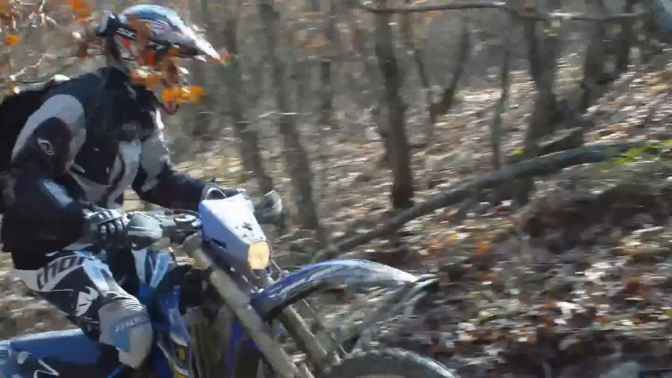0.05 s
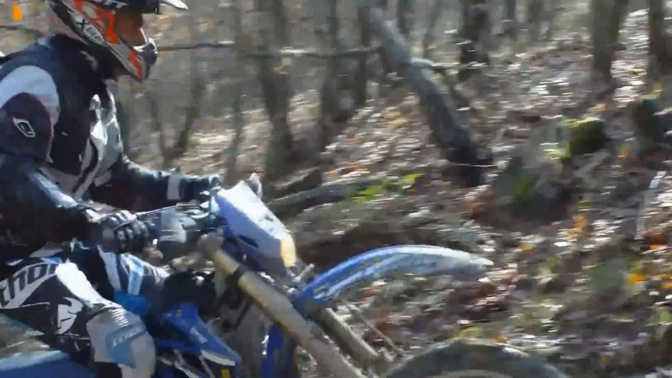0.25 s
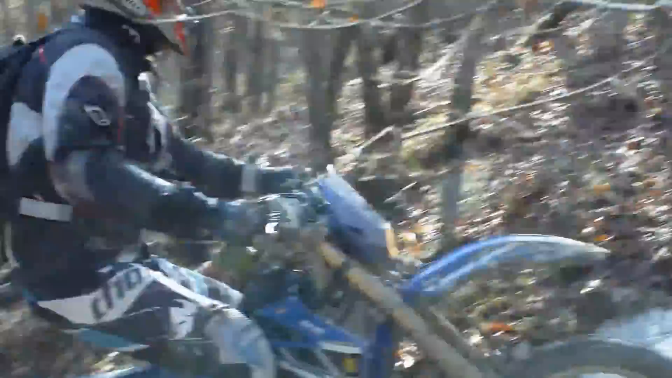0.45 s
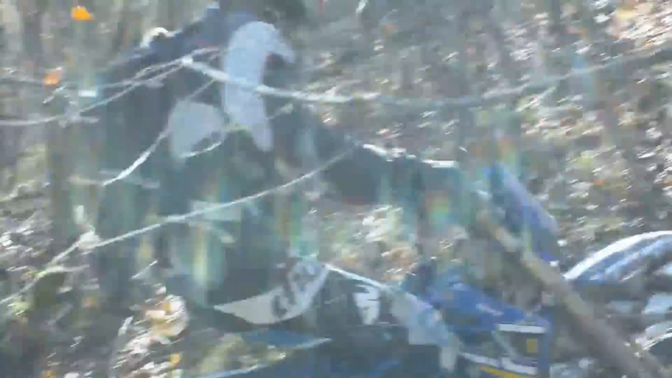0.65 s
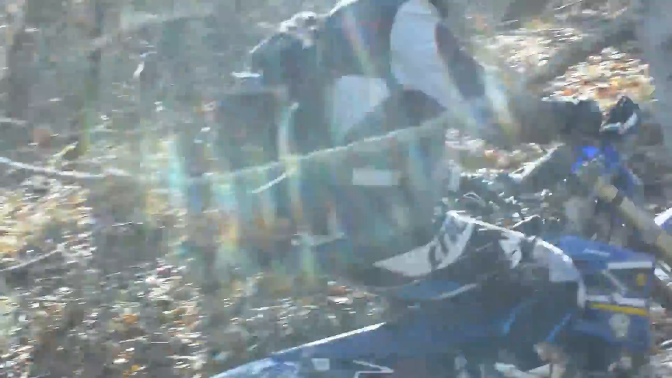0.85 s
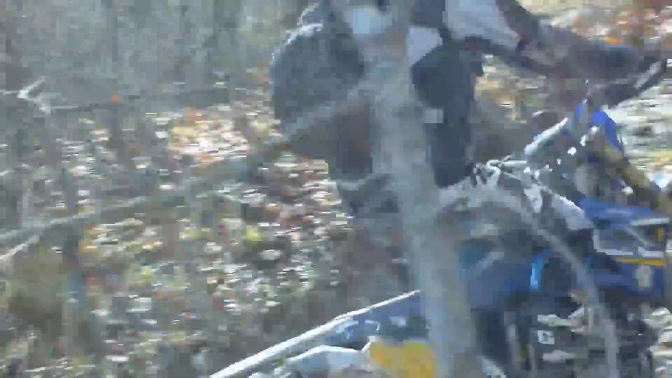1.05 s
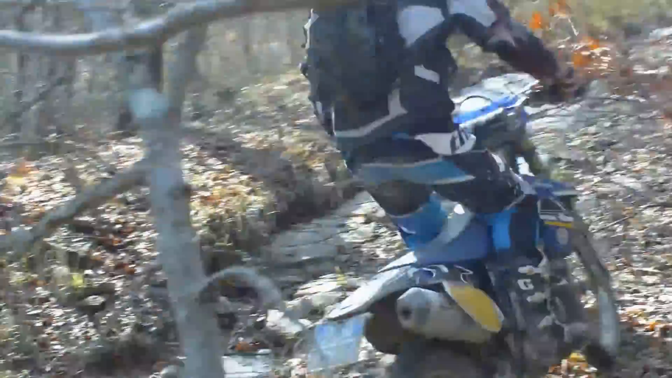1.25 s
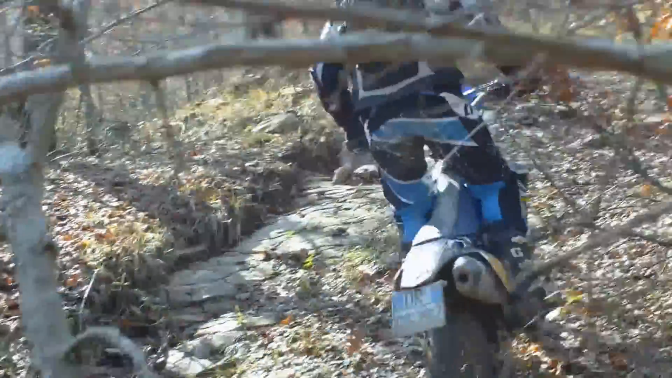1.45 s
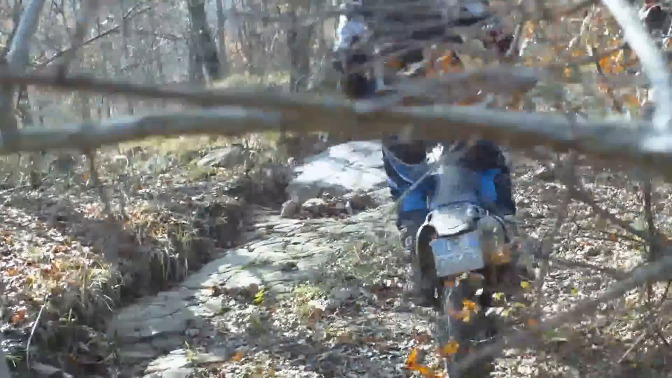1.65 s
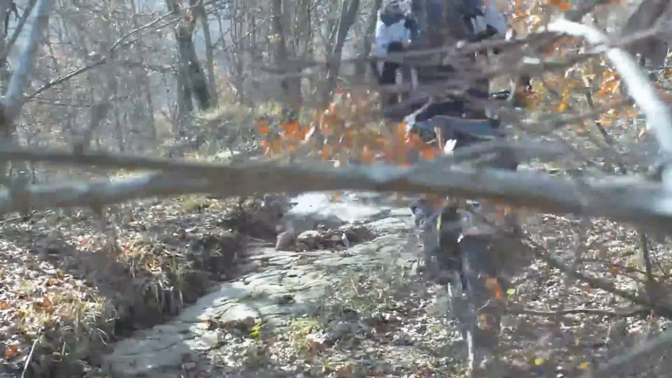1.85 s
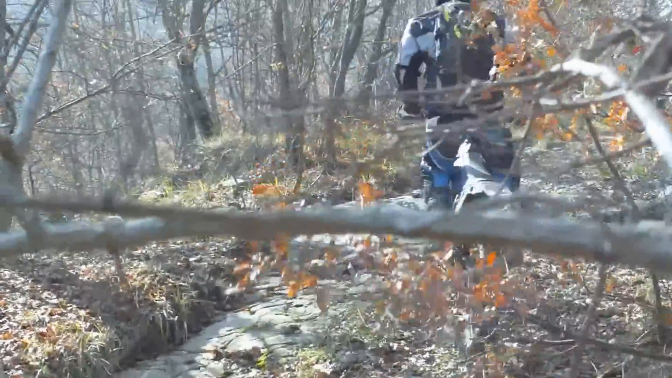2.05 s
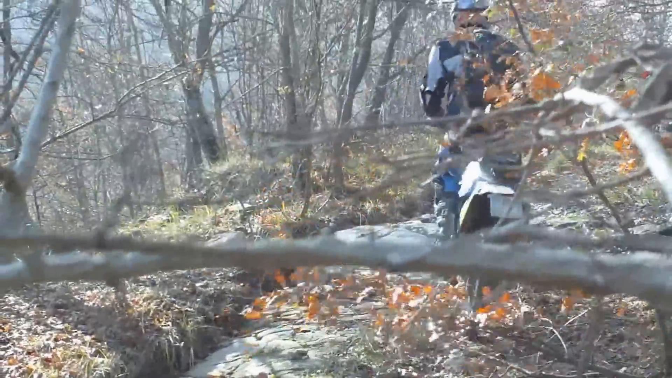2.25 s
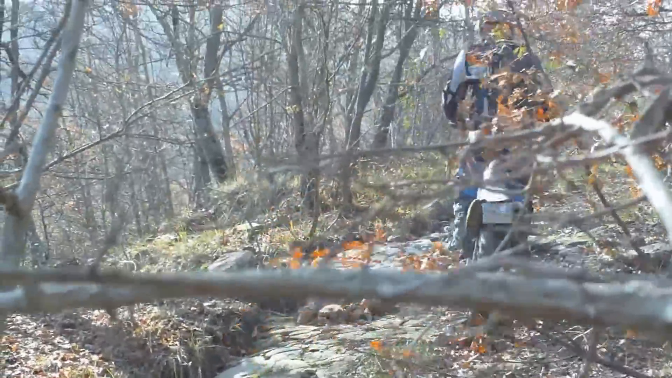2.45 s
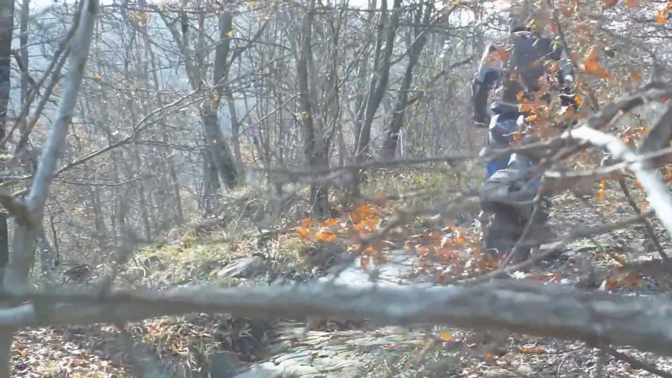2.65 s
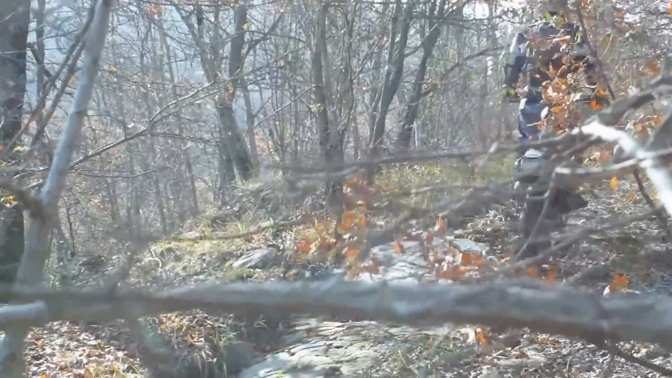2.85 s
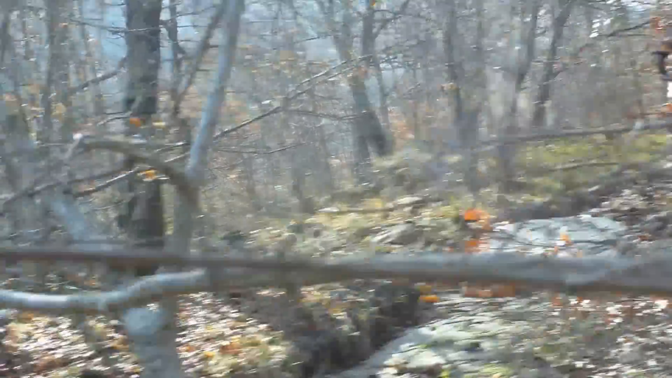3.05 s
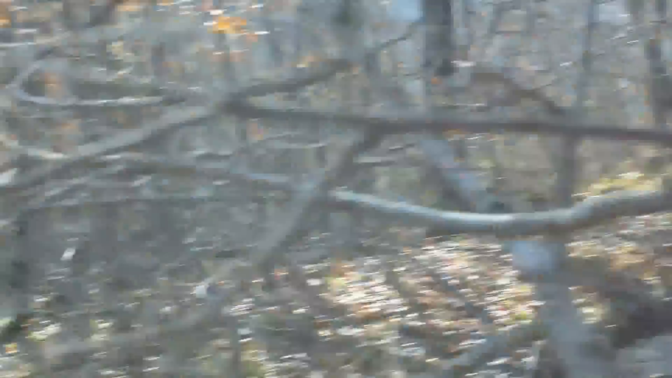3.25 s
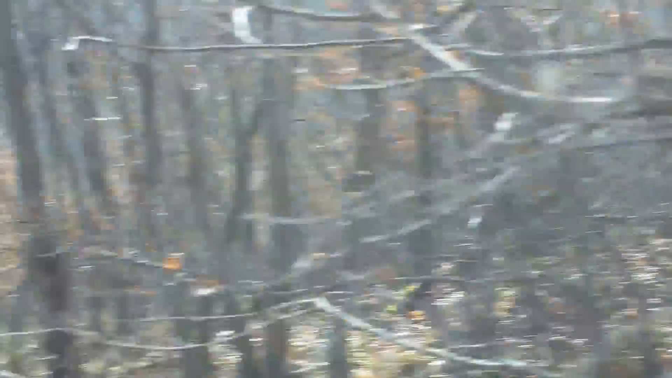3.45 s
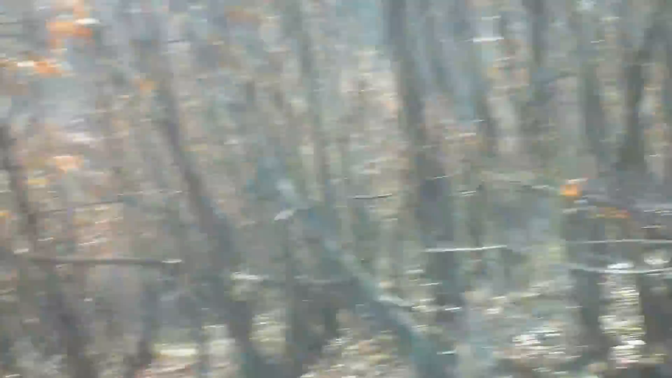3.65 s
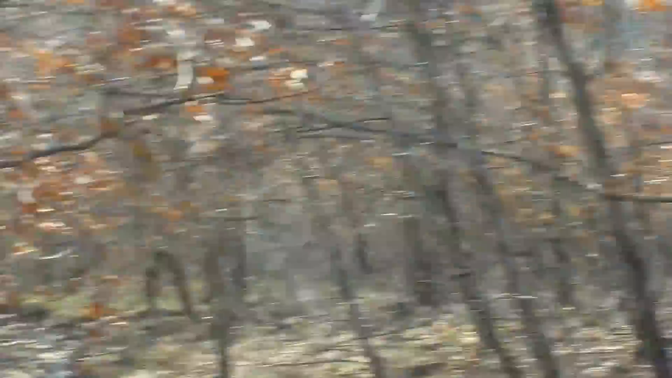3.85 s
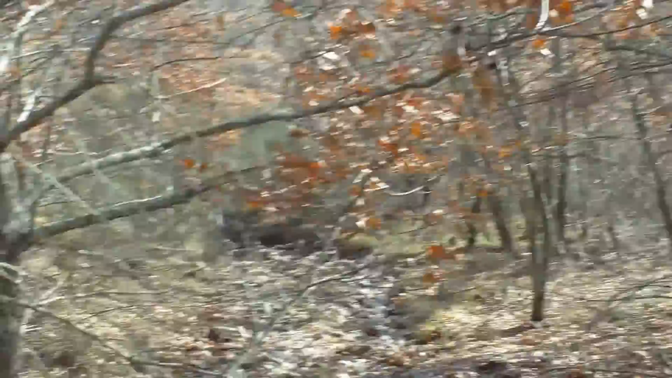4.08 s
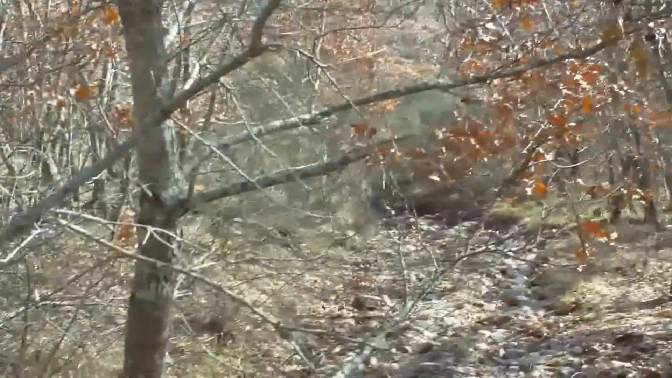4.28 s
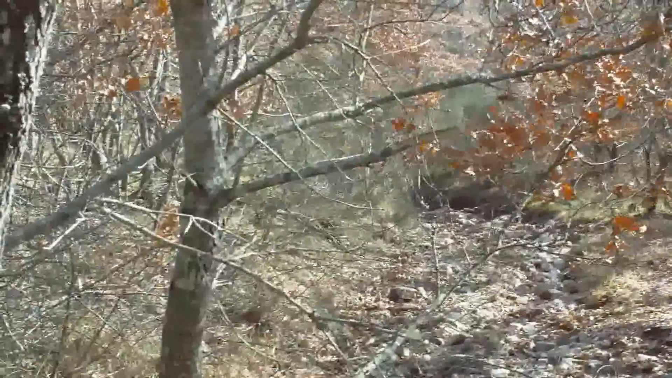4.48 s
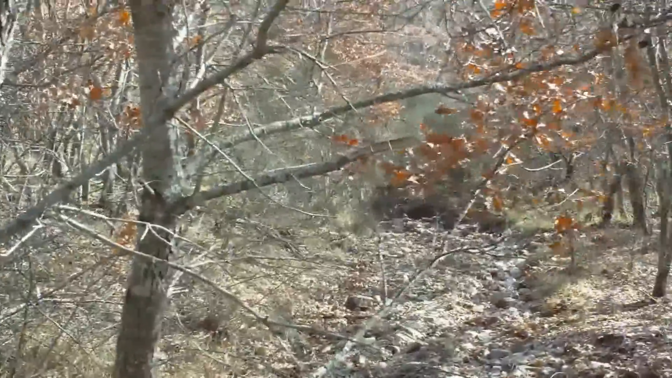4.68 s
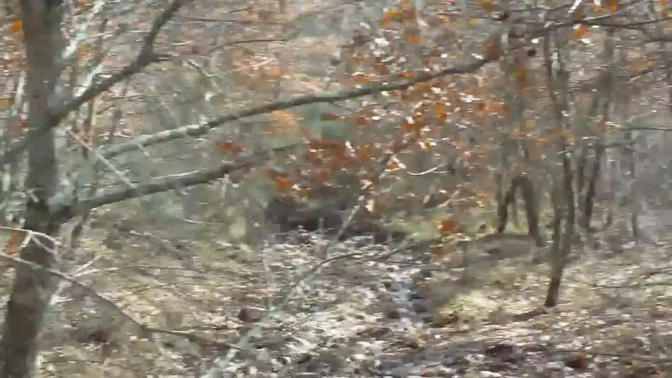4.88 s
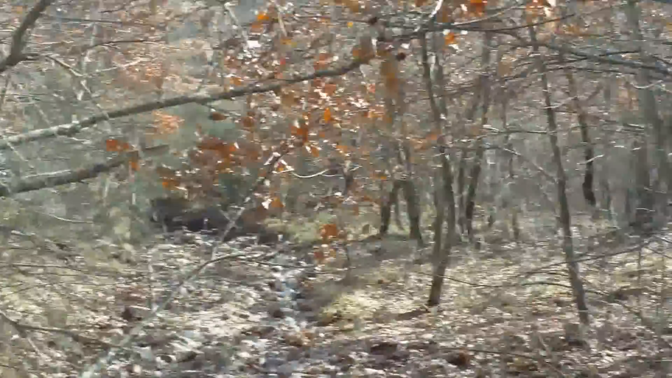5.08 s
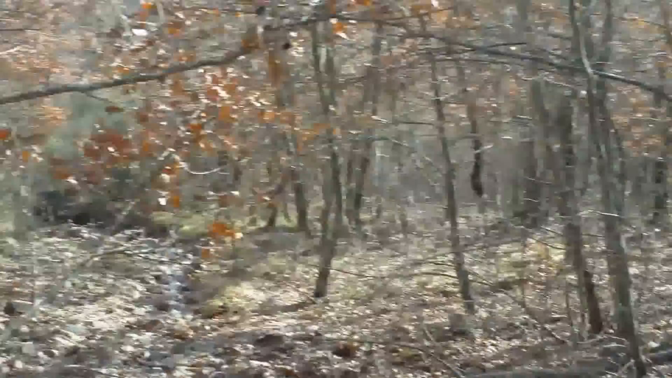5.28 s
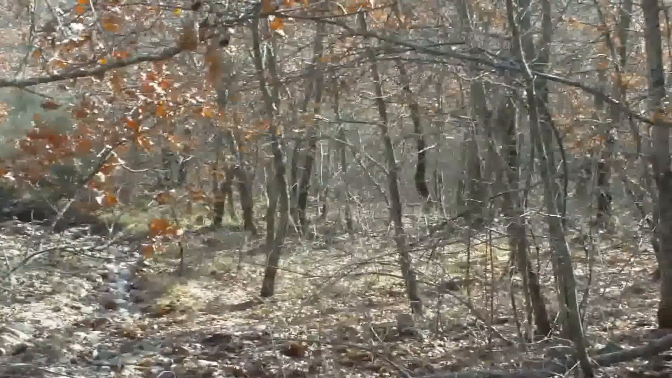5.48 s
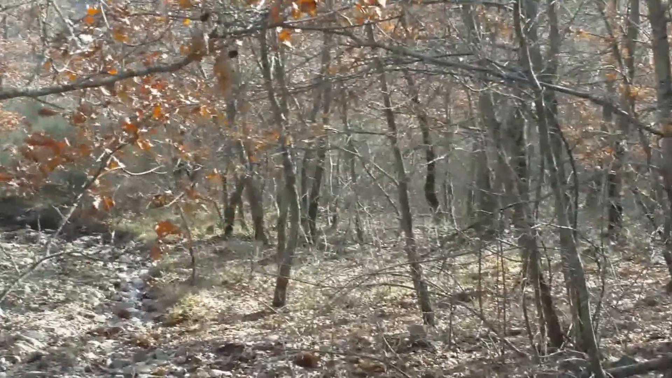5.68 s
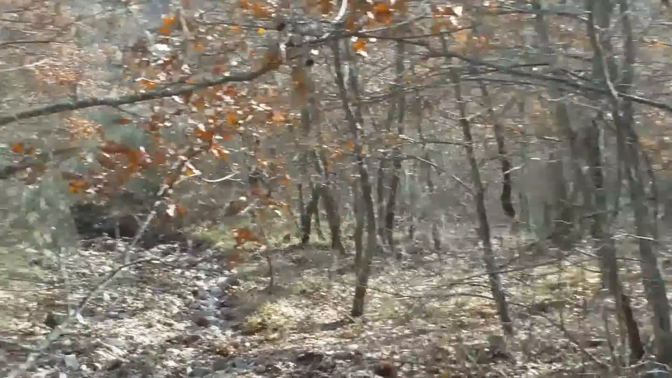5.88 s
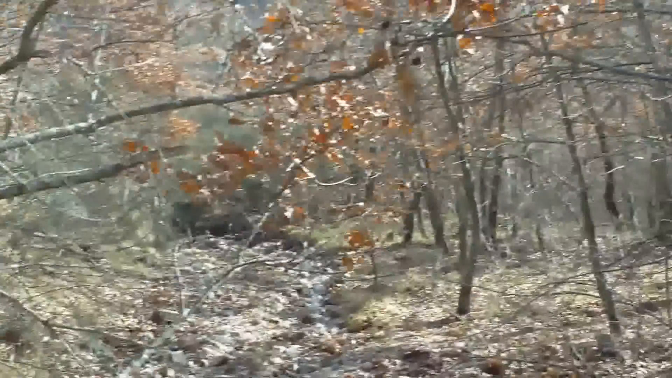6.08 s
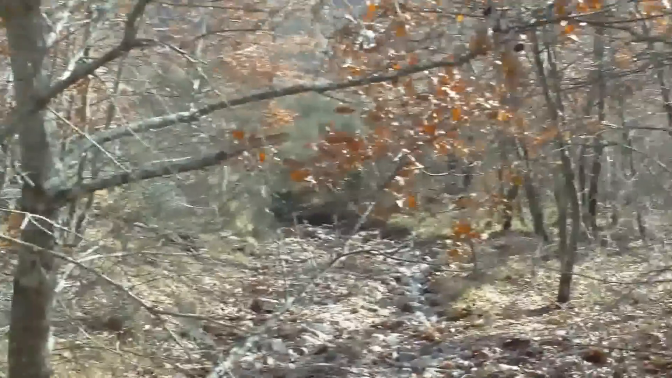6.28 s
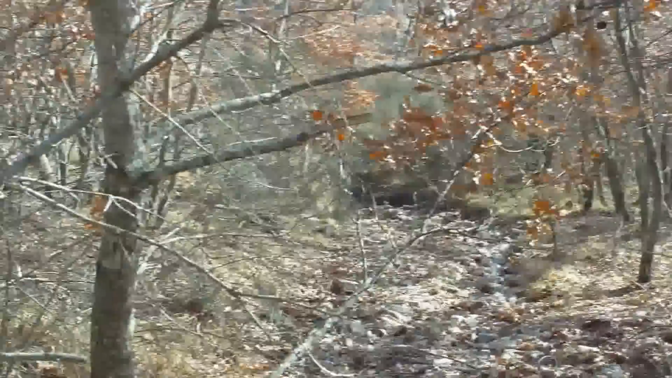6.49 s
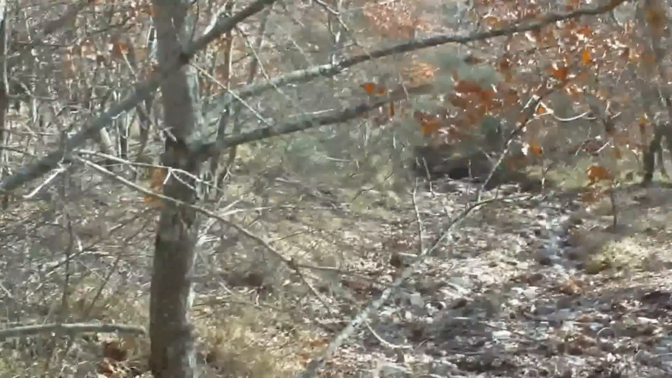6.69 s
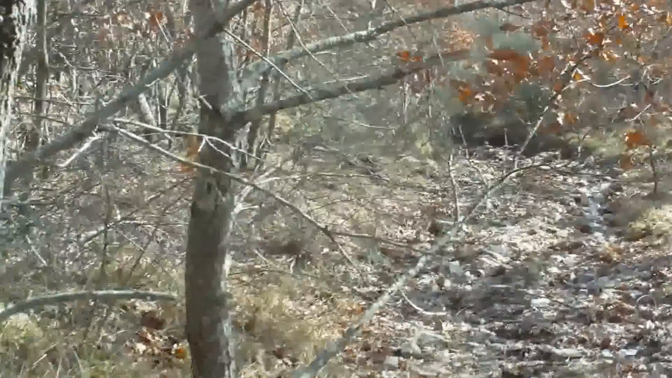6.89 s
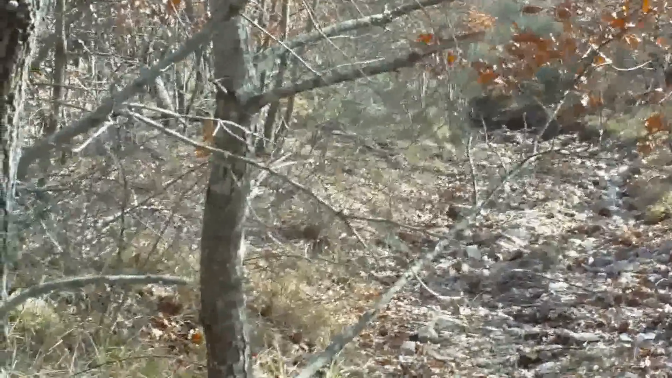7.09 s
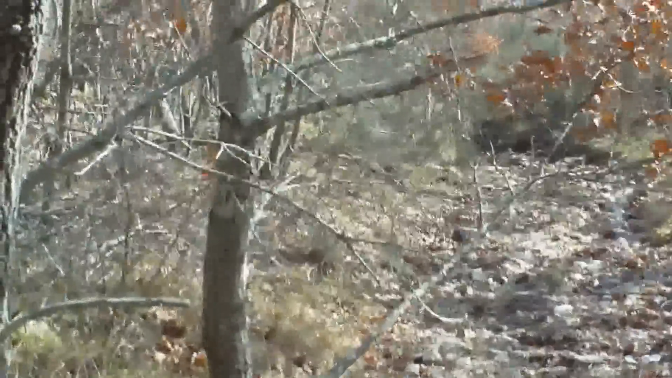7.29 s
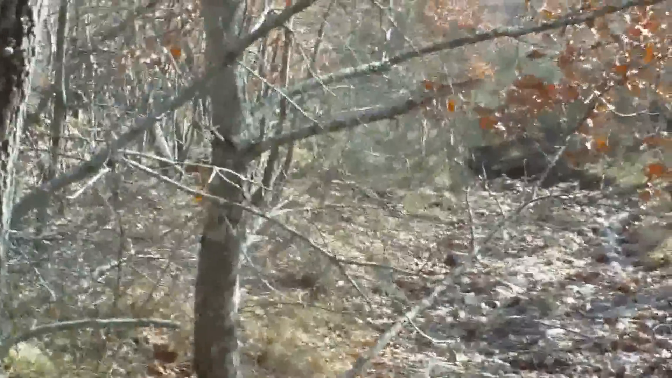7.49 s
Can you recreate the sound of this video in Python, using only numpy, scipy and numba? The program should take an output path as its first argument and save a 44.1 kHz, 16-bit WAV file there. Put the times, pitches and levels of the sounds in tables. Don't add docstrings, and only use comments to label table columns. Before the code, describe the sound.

A dirt bike blares past very close with cracking exhaust, pops and rattles away to a soft idle, then leaves rustle and a branch snaps.

```python
import sys
import numpy as np
from scipy import signal
from scipy.fft import rfft, irfft, next_fast_len
from scipy.io import wavfile
from scipy.ndimage import uniform_filter1d
from numba import njit

SR = 44100
rng = np.random.default_rng(int(sys.argv[2]) if len(sys.argv) > 2 else 0)


def elevation(decibels):
    levels = np.asarray(decibels, float)
    return 10 ** (levels / 20)


def unload_wav(signal):
    wavfile.write(
        sys.argv[1],
        SR,
        np.round(np.clip(np.atleast_2d(signal).T, -1, 1) * 32767).astype(np.int16),
    )


N = 332073

# (time [s], peak level [dB], ring frequency [Hz], edge above ring [dB])
HARD_FIRINGS = [(.030, -27, 790, -19), (.120, -30, 920, -17), (0.206, -16, 830, -15),
                (.235, -2.5, 784, -25), (0.264, -1, 695, -24), (.343, -3.5, 1140, -12),
                (.394, -1.5, 1175, -16), (.446, -7.5, 1140, -15), (.524, -17, 910, -19),
                (.771, -16, 800, -28), (.806, -8, 765, -30), (.836, -9, 800, -30), (1.012, -24, 700, -30),
                (1.053, -1, 768, -8), (1.239, -2, 817, -41), (1.271, -1, 1230, -8), (1.301, -3.5, 820, -35),
                (1.333, -5.5, 1250, -33), (1.362, -13, 830, -31), (1.479, -4, 720, -31),
                (1.528, -6, 910, -37), (1.554, -0.5, 1305, -8.5), (1.58, -6, 894, -5),
                (1.602, -2.5, 910, -23), (1.894, -9.5, 934, -31.5), (2.502, -10.5, 798, -28),
                (2.63, -21, 710, -34), (2.659, -7.5, 815, -22), (3.061, -2.5, 877, -35),
                (3.311, -11.5, 970, -24), (3.345, -12.5, 830, -24), (3.451, -11.5, 1135, -15),
                (3.669, -19.5, 1050, -32), (3.774, -10.5, 1280, -8), (3.805, -19, 983, -21),
                (3.986, -19.5, 1365, -8), (4.606, -15.5, 1120, -30), (4.635, -22, 1130, -27),
                (5.803, -43, 900, -15), (5.917, -52, 400, -20), (6.096, -52, 704, -6),
                (6.371, -52, 400, -20), (6.501, -50, 400, -20), (6.697, -39, 500, -15),
                (6.829, -52, 400, -20)]
# (time [s], peak level [dB], ring frequency [Hz], edge above ring [dB])
SHARP_CRACKS = [(1.8381, -3, 874, -8), (2.4687, -9, 1470, -13), (3.7076, -17, 1050, -10),
                (3.7428, -11, 1280, 0.5), (4.4902, -4, 1130, -8), (4.5189, -3.5, 1145, -3.5),
                (5.193, -21, 810, 0), (5.233, -15.5, 870, -9), (5.268, -27, 870, -5), (5.302, -25, 900, -7),
                (5.336, -25, 850, -6), (5.372, -26, 920, -8), (5.406, -24, 816, 1), (5.44, -26, 930, -8)]
# (time [s], firing rate [1/s])
ENGINE_SPEED = [(0, 31.5), (.13, 32.9), (.31, 38), (.47, 38.6), (.5, 39), (.56, 43), (.62, 45), (.67, 29.5),
                (.75, 29.5), (.85, 32), (.9, 30), (.98, 27.5), (1.03, 29.6), (1.1, 32.2), (1.35, 32.3),
                (1.48, 38.5), (1.6, 42), (1.64, 40.8), (1.71, 37), (1.8, 37.1), (1.9, 35.1), (2.02, 35.6),
                (2.1, 36.9), (2.23, 31), (2.36, 24.9), (2.47, 28), (2.55, 31.8), (2.65, 33), (2.74, 32.3),
                (2.85, 33.9), (3.03, 30.2), (3.07, 30.5), (3.15, 34), (3.24, 31.3), (3.38, 28.5), (3.5, 26),
                (3.68, 24), (3.76, 31.5), (3.81, 30.5), (3.88, 27), (3.97, 28.5), (4.05, 26), (4.3, 24.5),
                (4.46, 24.5), (4.51, 34), (4.6, 35), (4.72, 28.5), (4.9, 20), (5.05, 17.5), (5.17, 25),
                (5.25, 28.5), (5.33, 29.4), (5.42, 28.5), (5.55, 24.5), (5.62, 21.5), (5.9, 18.4),
                (6.08, 15.3), (6.3, 14.7), (7, 15), (7.35, 14.64), (7.55, 17.74)]


def rms_one(x):
    return x / np.sqrt(np.mean(x ** 2) + 1e-20)


def in_time(rows):
    s, *columns = np.transpose(rows)
    return [np.interp(np.arange(N) / SR, s, c) for c in columns]


def ramp(start_s, length_s):
    return np.clip((np.arange(N) / SR - start_s) / length_s, 0, 1)


def resonance(x, hz, width_hz):
    r = np.exp(-np.pi * width_hz / SR)
    feedback = [1, -2 * r * np.cos(2 * np.pi * hz / SR), r * r]
    return signal.lfilter([(1 - r * r) / 2, 0, (r * r - 1) / 2], feedback, x + 1e-18)


def body(x, modes):
    return sum((-1) ** k * elevation(db) * resonance(x, hz, width) for k, (hz, width, db) in enumerate(modes))


@njit
def gliding(x, hz, width_hz, sr):
    r = np.exp(-np.pi * width_hz / sr)
    y = np.zeros(len(x))
    for i in range(2, len(x)):
        drive = (1 - r * r) / 2 * (x[i] - x[i - 2])
        y[i] = drive + 2 * r * np.cos(2 * np.pi * hz[i] / sr) * y[i - 1] - r * r * y[i - 2]
    return y


def band(x, low_hz, high_hz):
    return signal.sosfilt(signal.butter(2, [low_hz, high_hz], "band", fs=SR, output="sos"), x)


def evened(x):
    return x / np.sqrt(uniform_filter1d(x ** 2, size=7000) + 1e-12)


def per_firing(x, level_db, at, spread_db):
    starts = np.r_[0, at[1:]]
    length = np.diff(np.r_[starts, N])
    rms = np.sqrt(np.add.reduceat(x ** 2, starts) / length + 1e-20)
    gain = elevation(level_db[starts + length // 3] + spread_db * rng.standard_normal(len(at))) / rms
    return x * uniform_filter1d(np.repeat(gain, length), size=60)


def firings():
    start_turn, peak_lag_s = 0.82, 0.0084
    crack_lag_s = 0.00032
    speed, = in_time(ENGINE_SPEED)
    t = np.arange(N) / SR
    turns = start_turn + np.cumsum(uniform_filter1d(speed, size=1500)) / SR
    hard_s = np.transpose(sorted(HARD_FIRINGS + SHARP_CRACKS))[0] - crack_lag_s + peak_lag_s
    hard = np.interp(hard_s, t, turns)
    whole = np.round(hard[0]) + np.r_[0, np.cumsum(np.round(np.diff(hard)))]
    turns += uniform_filter1d(np.interp(t, hard_s, whole - hard), size=5000)
    firing_s = np.interp(np.arange(1, int(turns[-1]) + 1), turns, t) - peak_lag_s
    return np.maximum((firing_s * SR).astype(int), 0)


def throttle():
    # (opens [s], shuts [s], bark on opening [dB], bark on shutting [dB],
    # hollow boom above bark [dB])
    pulls = [(-.1, 0.021, -33, -15, -21.5), (0.114, 0.255, -18.5, -14.5, -18.5),
             (0.268, 0.486, -13.5, -16, -13.5), (0.506, 0.65, -13.5, -14.5, -10.5),
             (.665, 0.743, -16, -17.5, -14), (0.77, 0.85, -17.5, -14.5, -9), (.86, 0.99, -17, -19.5, -23.5),
             (1.0, 1.03, -18, -18, -13), (1.026, 1.222, -16, -14.5, -10.5),
             (1.242, 1.475, -17.5, -18, -4.5), (1.488, 1.58, -13, -26, -1),
             (1.567, 1.631, -24.5, -20.5, -9), (1.677, 1.831, -16, -17, -7.5),
             (1.855, 2.097, -18, -17.5, -9), (2.205, 2.464, -30.5, -27, -21.5),
             (2.456, 2.72, -23.5, -17.5, -18), (2.726, 3.047, -19, -25, -15), (3.043, 3.35, -21, -26, -12),
             (3.56, 3.66, -44, -38, -15), (3.672, 3.766, -33, -25, -1), (3.896, 4.01, -38, -30, -4),
             (4.014, 4.218, -33, -37.5, -5.5), (4.256, 4.482, -41.5, -41.5, -15),
             (4.477, 4.516, -22.5, -25, 0), (4.653, 4.854, -34, -41.5, -20), (5.09, 5.142, -57, -44, -15),
             (5.135, 5.163, -44, -44, -15), (5.167, 5.442, -31.5, -33.5, -6.5),
             (5.703, 7.6, -50.5, -64.5, -10.5)]
    rise_db_per_s, shut_s, shut_db, coast_db_per_s = 350, 0.13, 10, 29
    t = np.arange(0, N + 64, 64) / SR
    opens, shuts, first_db, last_db, hollow_db = np.transpose(pulls)[:, :, None]
    coast = 1 - np.exp(-np.maximum(t - shuts, 0) / shut_s) * (t >= opens)
    progress = np.clip((t - opens) / (shuts - opens), 0, 1)
    level_db = first_db + (last_db - first_db) * progress - shut_db * coast
    level_db -= rise_db_per_s * np.maximum(opens - t, 0) + coast_db_per_s * np.maximum(t - shuts, 0)
    top = level_db.argmax(axis=0)
    rows = [t, level_db.max(axis=0), hollow_db[top, 0], coast[top, np.arange(len(t))]]
    return in_time(np.transpose(rows))


def blowdown(at, rise_s, fall_s, open_share, echo_s, echo):
    cycle = np.clip(np.searchsorted(at, np.arange(N), "right") - 1, 0, len(at) - 2)
    age_s = np.maximum(np.arange(N) - at[cycle], 0) / SR
    turn = age_s * SR / np.diff(at)[cycle]

    def puff(t):
        t = np.maximum(t, 0)
        return (1 - np.exp(-t / rise_s)) * np.exp(-t / fall_s)

    valve = 1 / (1 + np.exp((turn - open_share) / 0.2))
    return rms_one((puff(age_s) + echo * puff(age_s - echo_s)) * valve)


def train(at, spread_db):
    clicks = np.zeros(N)
    clicks[at] = elevation(spread_db * rng.standard_normal(len(at)))
    return clicks


def boom(at, bark_db, deep_db, hollow_db, coast):
    # (time [s], deep frequency [Hz], hollow frequency [Hz],
    # clean pipe tone above bark [dB])
    chambers = [(0, 147, 310, -28), (.15, 176, 307, -16), (.27, 199, 367, -7), (.45, 200, 370, -11.5),
                (.56, 210, 385, -21), (.64, 180, 405, -24), (.7, 135, 325, -21.5), (.8, 138, 325, -21),
                (1.03, 134, 302, -23), (1.15, 172, 367, -29.5), (1.45, 166, 357.5, -12.5),
                (1.6, 190, 356, -4.5), (1.8, 165, 376, -9.5), (2.1, 176, 377, -5.5), (2.38, 129, 337, -13),
                (2.55, 164, 340, -15.5), (2.8, 175, 338, -22), (3.3, 162, 333, -31.5),
                (3.45, 143, 331, -14), (3.8, 156, 329, -29), (4.5, 149, 356, -10.5), (5.3, 147, 321, -9),
                (5.8, 138, 321, -15), (7.53, 134, 325, -10)]
    # (time [s], level above deep boom [dB])
    crank = [(0, -25), (.3, -19), (.6, -11), (.75, -20), (1.3, -19), (1.6, -14), (2.1, -26.5), (2.4, -28.5),
             (3.4, -25.5), (7.53, -28)]
    pipe_tone_hz, deep_width_hz, hollow_width_hz = 553, 100, 89
    hollow_coast_hz, hollow_coast_db, deep_coast_db = 27, -14, -3
    deep_hz, hollow_hz, tone_db = in_time(chambers)
    deep_db = bark_db + deep_db + deep_coast_db * coast
    hollow_db = bark_db + hollow_db + hollow_coast_db * np.minimum(2 * coast, 1)
    hollow_hz = hollow_hz + hollow_coast_hz * coast
    pulses = rms_one(train(at, spread_db=0.5)) + .12 * rng.standard_normal(N)

    deep = gliding(gliding(pulses, deep_hz, deep_width_hz, SR), deep_hz, deep_width_hz, SR)
    deep = band(band(deep, 118, 260), 112, 400)
    deep = np.roll(deep, -int(0.0072 * SR))

    roughness = np.interp(np.arange(N) / SR, [2.1, 2.5], [.1, .45])
    rough = pulses + roughness * rng.standard_normal(N)
    hollow = gliding(gliding(rough, hollow_hz, hollow_width_hz, SR), hollow_hz, hollow_width_hz, SR)
    hollow *= blowdown(at, 0.002, 0.02, open_share=0.75, echo_s=0.014, echo=0.07) + 0.3
    hollow = band(hollow, 235, 790)

    second_order = band(gliding(pulses, 2 * in_time(ENGINE_SPEED)[0], 16, SR), 50, 100)
    tone = resonance(resonance(pulses, pipe_tone_hz, 130), pipe_tone_hz, 130)
    out = per_firing(deep, deep_db, at, spread_db=2.0)
    out += elevation(deep_db + in_time(crank)[0]) * evened(second_order)
    out += per_firing(tone, bark_db + tone_db, at, spread_db=-3.0)
    return out + per_firing(hollow, hollow_db, at, spread_db=1.0)


def pipe_bark(at, bark_db, steady, noise, lumps, centre_hz):
    # (frequency [Hz], width [Hz], level [dB])
    tailpipe = [(586.4, 102, 2), (688, 190, 6), (805, 293, 2)]
    # (frequency [Hz], width [Hz], level [dB])
    header = [(1160, 250, 0), (1370, 133, 7), (1442, 272, 4)]
    # (time [s], frequency [Hz], level above noise drive [dB])
    flank = [(0, 1300, -7), (.45, 1350, -17.5), (.65, 1410, 2.5), (.9, 1330, -1), (1.0, 1320, 0),
             (1.15, 1340, -8), (1.6, 1377, -18.5), (7.53, 1360, -31.5)]
    flow = blowdown(at, 0.0007, 0.0032, open_share=0.3, echo_s=0.0075, echo=0.55)
    gas = noise * ((1 - steady) * flow + .85 * steady) * lumps
    drive = gas[0] + 10.5 * train(at, spread_db=1.5)
    side = elevation((centre_hz - 950) / 22)
    bark = body(drive, tailpipe) + side * body(drive, header)
    bark += .7 * gliding(gas[2], centre_hz, 250, SR)
    whine_hz, whine_db = in_time(flank)
    bark += elevation(whine_db + 1) * gliding(gas[1], whine_hz, 200, SR)
    cap = 1.3 * ramp(3.2, 1) * resonance(resonance(drive, 417, 150), 417, 150)
    return per_firing(band(band(bark, 480, 1700), 450, 1800) + cap, bark_db, at, spread_db=1.0)


def plate_rasp(at, bark_db, spit, noise, lumps):
    # (frequency [Hz], width [Hz], level [dB])
    plates = [(1970, 190, 7.5), (2430, 420, 4), (3117, 360, -1), (3800, 670, -6.5)]
    rasp_db = bark_db - 9 + (0.78 - 1) * (bark_db + 21.5) + 2.5 * ramp(3.2, 1)
    gas = noise * spit * lumps
    loose = 4.2 * ramp(3.8, 2.4) * resonance(gas[0], 2790, 200)
    return per_firing(body(gas[1], plates) + loose, rasp_db, at, spread_db=1.2)


def valve_hiss(at, bark_db, hiss_db, spit, noise):
    # (frequency [Hz], width [Hz], level [dB])
    gear = [(3480, 820, 4.5), (4170, 160, 1), (4474, 130, 0), (5570, 66, 2.5)]
    hiss_db = bark_db + hiss_db + (0.8 - 1) * (bark_db + 1.5)
    gas = noise * (spit + .8)
    return per_firing(body(gas[2], gear) + 1.7 * band(gas[1], 3020, 6360), hiss_db, at, spread_db=1.5)


def after_ring(at, bark_db):
    # (time [s], ring frequency [Hz], level above bark [dB])
    ringing = [(0, 700, -17.5), (.9, 700, -12), (1.2, 728, -10), (1.6, 666, -8), (1.7, 628, -2.5),
               (2.1, 662, -1.5), (2.3, 647, -3), (2.5, 700, -6.5), (2.9, 700, 1.5), (3.35, 724, -6),
               (3.7, 786, -10), (4.4, 790, -24), (5.3, 820, 1), (5.7, 800, -20), (7.53, 805, -23)]
    start_s, length_s = 0.0066, 0.01
    hz, ring_db = in_time(ringing)
    cycle = np.clip(np.searchsorted(at, np.arange(N), "right") - 1, 0, len(at) - 1)
    chance = rng.standard_normal((len(at), 3))[cycle].T
    age_s = (np.arange(N) - at[cycle]) / SR - start_s - .001 * chance[0]
    shape = np.sin(np.pi * np.clip(age_s / length_s, 0, 1) ** 1.3)
    swing = np.sin(2 * np.pi * hz[at[cycle]] * (1 + .04 * chance[1]) * age_s)
    return 2 * elevation(bark_db + ring_db + 2.0 * chance[2]) * shape * swing


def engine():
    # (time [s], bark centre [Hz], steady clatter share [0-1],
    # deep boom above bark [dB], hiss above bark [dB])
    view = [(0, 906, 0.44, -20.5, -9.5), (.5, 894, 1, -20, -11.5), (.62, 906, 0.85, -29, -10),
            (.95, 920, 0.94, -26.5, -12), (1.32, 844, 0.2, -20.5, -11.5), (1.6, 890, 0.3, -17, -13.5),
            (1.95, 750, 0.35, -16.5, -16), (2.3, 975, 0.5, -12.5, -14), (2.55, 810, 0.49, -17, -17),
            (2.9, 750, 0.41, -16, -15), (3.25, 946, 0.53, -17, -14), (3.8, 950, 0.47, -10.5, -14.5),
            (4.36, 890, 0.76, -12, -17), (4.56, 1000, 0.35, -15.5, -15), (5.2, 920, 0.52, -15, -15),
            (5.75, 960, 0.35, -11, -20.5), (6.3, 1000, 0.26, -3.5, -36), (7.53, 920, 0.3, 6.5, -1)]
    spit_lag_s, coast_clatter = 0.0015, 0.56
    at = firings()
    bark_db, hollow_db, coast = throttle()
    centre_hz, steady, deep_db, hiss_db = in_time(view)
    steady = np.clip(steady + coast_clatter * coast, 0, 1)
    noise = rng.standard_normal((3, N))
    lumps = elevation(2.0 * rms_one(band(rng.standard_normal(N), 52, 270)))
    late = at + int(spit_lag_s * SR)
    flow = blowdown(late, 0.0024, 0.0046, open_share=0.32, echo_s=0.0034, echo=0.1)
    spit = (1 - steady) * flow + 2.4 * steady
    out = pipe_bark(at, bark_db, steady, noise, lumps, centre_hz)
    out += plate_rasp(at, bark_db, spit, noise, lumps)
    out += valve_hiss(at, bark_db, hiss_db, spit, noise)
    out += boom(at, bark_db, deep_db, hollow_db, coast)
    return out + after_ring(at, bark_db)


def floor():
    # (frequency [Hz], level [dB per Hz])
    hush = [(18, -57), (30, -32), (138, -1.5), (381, -9.5), (694, -8.5), (1520, -16), (2780, -20),
            (5680, -25), (7500, -27.5), (9750, -62), (16500, -120)]
    floor_db = -52.5
    size = next_fast_len(N)
    hz = np.arange(size // 2 + 1) * SR / size + 1
    hush_hz, hush_db = np.transpose(hush)
    shape = elevation(np.interp(np.log(hz), np.log(hush_hz), hush_db))
    shape *= np.interp(hz, [90, 130, 350, 480], [.6, .3, .4, 1])
    return elevation(floor_db + 4.5) * rms_one(irfft(rfft(rng.standard_normal(size)) * shape, size))[:N]


def wood(x):
    t60_s, gap_s = 0.79, .012
    t = np.arange(SR // 2) / SR
    tail = rng.standard_normal(len(t)) * elevation(-60 * t / t60_s) * (t > gap_s)
    tail = band(tail, 140, 4500)
    return signal.fftconvolve(x, tail / np.sqrt(np.sum(tail ** 2)))[:N]


def knocks(table, rise_s, ring_s, overtone, click, edge_s, edge_hz, top_hz=6200):
    length = 1400
    out, t = np.zeros(N + length), np.arange(length) / SR
    grit = rng.standard_normal((len(table), length))
    shock = click * (np.arange(length) == 40)
    decay = np.exp(-t / ring_s)
    for (s, peak_db, hz, edge_db), noise in zip(table, grit):
        swing = np.sin(2 * np.pi * hz * t) + overtone * np.sin(2 * np.pi * 1.796 * hz * t) * decay
        ring = swing * (1 - np.exp(-t / rise_s)) * decay
        edge = band(shock + noise * np.exp(-t / edge_s), edge_hz, top_hz)
        i = int(s * SR)
        out[i:i + length] += elevation(peak_db) * (1.92 * ring + elevation(edge_db + 6.5) * edge)
    out = out[:N]
    thump = .02 * band(out, 25, 150) + 0.032 * band(np.abs(out), 13, 67)
    return band(out, 360, 7900) + thump


def hard_firings():
    return knocks(HARD_FIRINGS, rise_s=0.0011, ring_s=0.0036, overtone=0.45, click=3.0,
                  edge_s=0.0018, edge_hz=900)


def frame_clacks():
    # (time [s], peak level [dB], ring frequency [Hz], edge above ring [dB])
    clacks = [(.712, -12.5, 730, -23), (.847, -10.5, 880, -25), (1.1645, -10, 1305, 3),
              (2.187, -29.5, 1010, 11), (2.7091, -15.5, 1710, -1), (2.803, -17.5, 1574, -2),
              (3.2191, -21.5, 1035, -1), (3.578, -25, 1060, -26), (4.1523, -33.5, 2510, 5.5),
              (4.812, -33, 1220, -19), (5.128, -39, 905, -10), (5.143, -33, 1110, -3),
              (5.66, -37, 2820, -15), (5.699, -37, 870, -5)]
    return knocks(clacks, rise_s=0.0004, ring_s=0.0055, overtone=0.2, click=2.5,
                  edge_s=0.0036, edge_hz=2300)


def sharp_cracks():
    return knocks(SHARP_CRACKS, rise_s=0.0003, ring_s=0.0023, overtone=0.62, click=3.0,
                  edge_s=0.0017, edge_hz=1400, top_hz=3600)


def leaves():
    # (start [s], loudest [s], end [s], low rustle [dB], crisp rustle above low [dB])
    scuffs = [
        (6.05, 6.3, 6.33, -54, 0),
        (6.33, 6.59, 6.68, -43, 0),
        (6.69, 6.7, 6.71, -46, -5),
        (7.06, 7.065, 7.09, -41, -6),
        (7.085, 7.115, 7.165, -35, -8),
        (7.172, 7.174, 7.18, -27, -20),
        (7.185, 7.26, 7.32, -37, 1),
        (7.32, 7.37, 7.41, -45, -3),
        (7.405, 7.47, 7.53, -37, 0),
        (7.48, 7.492, 7.503, -30, -4),
    ]
    edge_db, fade_s = -7, .01
    t, low, crisp = np.arange(N) / SR, 0, 0
    for start, top, end, db, crisp_db in scuffs:
        on = np.clip(np.minimum(4 * (t - start), end - t) / fade_s + 1, 0, 1)
        swell = on * elevation(db + edge_db * np.interp(t, [start, top, end], [1, 0, 1]))
        low = low + swell
        crisp = crisp + swell * elevation(crisp_db)
    strength = elevation(1.8 * np.minimum(rng.exponential(1, (2, N)), 5))
    grains = strength * rng.standard_normal((2, N)) * (rng.random((2, N)) < .15)
    return low * rms_one(band(grains[0], 660, 2400)) + crisp * rms_one(band(grains[1], 2700, 6700))


def twig_snaps():
    # (time [s], peak level [dB], ring frequency [Hz], edge above ring [dB])
    snaps = [
        (6.156, -40.5, 5540, -1),
        (6.222, -42, 2960, 4),
        (6.596, -32, 1650, 6),
        (6.934, -46, 5800, 15.5),
        (6.949, -45, 1100, 2),
        (7.093, -29, 750, -25),
        (7.489, -23, 2910, -12),
        (7.494, -27, 1530, -19),
        (7.495, -29.5, 650, -17),
    ]
    return knocks(snaps, rise_s=0.00026, ring_s=0.0043, overtone=0.61, click=10.0,
                  edge_s=0.0022, edge_hz=3900)


def branch_break():
    # (time [s], peak level [dB], ring frequency [Hz], edge above ring [dB])
    breaks = [
        (7.058, -27, 800, -1),
        (7.1695, -0.5, 836, -11.5),
    ]
    return knocks(breaks, rise_s=0.0008, ring_s=0.00095, overtone=0.23, click=4.5,
                  edge_s=0.0023, edge_hz=1000, top_hz=7400)


def scene():
    bike = engine() + hard_firings() + sharp_cracks() + frame_clacks()
    bike = bike - 0.26 * ramp(0, 13.0) * resonance(bike, 1723, 300)
    near = leaves() + twig_snaps() + branch_break()
    return (bike + elevation(-17.5) * wood(bike) + near + floor())[None]


def band_limit(x):
    return signal.sosfilt(signal.butter(12, 8040, fs=SR, output="sos"), x)


def record(dry):
    x = 1.005 * np.tanh(dry / 1.44)
    x = signal.sosfilt(signal.cheby1(8, 1, 7116, fs=SR, output="sos"), x)
    x = signal.sosfilt(signal.butter(2, 60, "high", fs=SR, output="sos"), x)
    return band_limit(x)


dry = scene()
out = record(dry)
unload_wav(out)
```